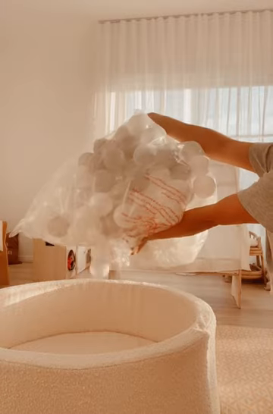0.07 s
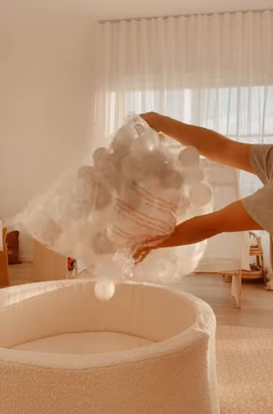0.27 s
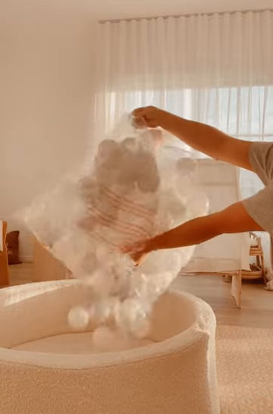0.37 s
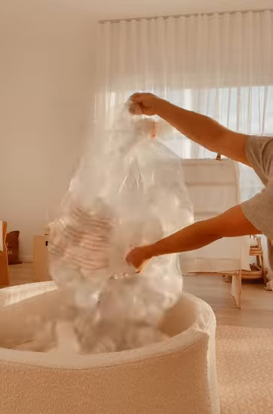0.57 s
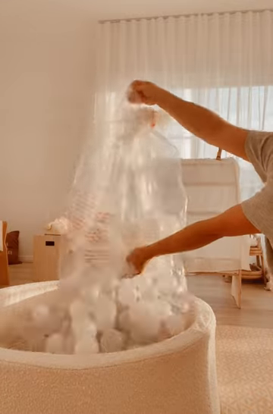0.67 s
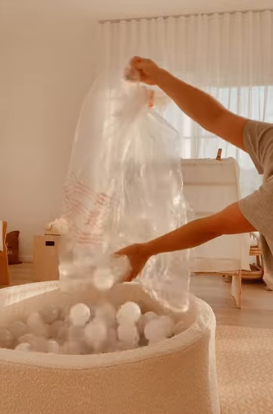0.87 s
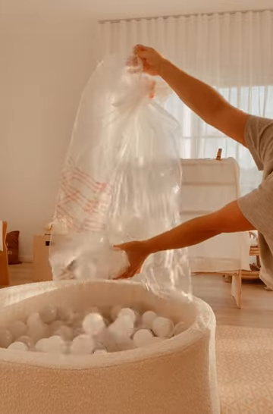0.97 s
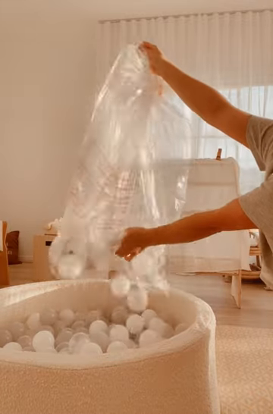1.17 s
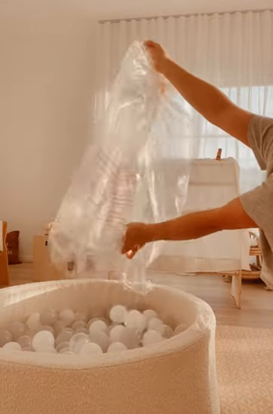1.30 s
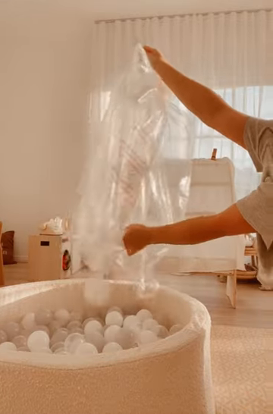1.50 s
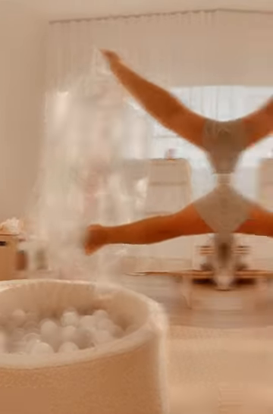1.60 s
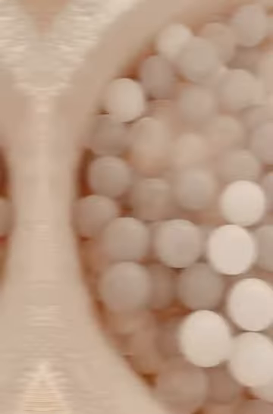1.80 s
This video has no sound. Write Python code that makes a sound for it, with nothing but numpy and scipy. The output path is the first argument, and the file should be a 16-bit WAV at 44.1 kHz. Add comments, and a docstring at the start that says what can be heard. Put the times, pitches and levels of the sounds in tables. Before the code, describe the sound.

Hollow plastic balls pour into a padded pit in a furnished room. One drops first, then the mass tumbles with clatter and soft thuds while a thin bag crinkles. A few stragglers land and the sound fades.

```python
"""Hollow plastic balls pour from a thin plastic bag into a padded ball pit in a furnished room.
One ball drops first, the mass follows, then a few stragglers. Each impact excites the shell's
resonances as a click and a hollow knock, while the yielding padding gives a low thud.
The balls clatter against each other and the bag crinkles; the sound fades out at the end."""
import sys
import numpy as np
from scipy import signal
from scipy.fft import rfft, irfft, next_fast_len
from scipy.io import wavfile

SR = 44100
rng = np.random.default_rng(int(sys.argv[2]) if len(sys.argv) > 2 else 0)


def inscribe(sig):
    """Save sig as 16-bit PCM at rate SR to the path in sys.argv[1].

    A 1-D sig is mono; a 2-D sig holds one channel per row.
    Samples are clipped to [-1, 1] before scaling.
    """
    pcm = np.round(np.clip(np.atleast_2d(sig).T, -1, 1) * 32767)
    wavfile.write(sys.argv[1], SR, pcm.astype(np.int16))


N = 81585

# Reverberation time of the room: frequency_hz, t60_s
ROOM_DECAY = [(100, 0.5), (500, 0.5), (4000, 0.57), (12000, 0.6)]
# Relative envelope of the crinkling bag: time_s, level_db
CRINKLE_LEVEL = [(0, -70), (.07, -65), (.19, -63.5), (.3, -58), (.39, -54), (.6, -53), (.75, -58),
                 (.87, -65), (.94, -60), (.98, -63), (1.06, -59.5), (1.17, -59.5), (1.32, -68), (1.36, -64),
                 (1.4, -70), (1.44, -66), (1.52, -69), (1.57, -82.5), (1.7, -89)]
# Sharp snaps of the bag film: start_s, level_db
FILM_SNAPS = [(.098, -61), (1.051, -55.5), (1.055, -59.5), (1.526, -71.5)]
# Spectrum of the thin film: frequency_hz, gain_db
FILM_SPECTRUM = [(100, -8.5), (500, 13), (1500, 8), (4000, 2), (6500, 2), (9500, -0.5), (12500, -8),
                 (15500, -15)]
# Envelope of the balls clattering together: time_s, level_db
CLATTER_LEVEL = [(0, -63), (.08, -59.5), (.2, -54), (.22, -50.5), (.33, -49), (.39, -40.5), (.57, -36.5),
                 (.74, -39), (.82, -43.5), (.97, -49), (1.045, -52.5), (1.08, -43.5), (1.14, -52),
                 (1.23, -52.5), (1.25, -49), (1.39, -61.5), (1.45, -59.5), (1.52, -62.5), (1.57, -69),
                 (1.7, -84.5)]
# Two shells clacking together: start_s, level_db
SHELL_CLACKS = [(1.048, -45), (1.054, -45.5), (1.527, -62), (1.581, -66.5)]
# Click spectrum of a thin plastic shell: frequency_hz, gain_db
SHELL_SPECTRUM = [(200, -45), (700, -11.5), (1000, 1.5), (1350, 3.5), (1800, -0.5), (2400, 0.5), (3200, -1),
                  (4100, 1), (4800, -6), (5600, -10), (6600, -20), (9000, -30), (15000, -45)]
# Spectrum of the padded floor: frequency_hz, gain_db
PADDING_SPECTRUM = [(25, -12), (55, -25), (75, -14.5), (89, -8.5), (104, -11.5), (127, 4), (157, 1.5),
                    (180, -10), (200, 3), (225, -11.5), (270, -4.5), (310, -4.5), (500, -34.5), (1500, -54)]
# Knock spectrum of a ball landing on the padding: frequency_hz, gain_db
FLOOR_KNOCK_SPECTRUM = [(100, -34.5), (220, 2.5), (300, -17), (355, 5.5), (450, -1.5), (570, -7.5),
                        (760, -2.5), (850, -11), (970, -20.5), (1500, -37.5), (4000, -54)]
# Knock spectrum of a ball landing on other balls: frequency_hz, gain_db
HEAP_KNOCK_SPECTRUM = [(100, -47), (220, 4.5), (300, -2), (380, -4), (480, 1), (570, -3), (670, -1.5),
                       (790, -0.5), (860, -9.5), (980, -19.5), (1500, -34), (4000, -54.5)]
# Single balls landing: start_s, thud_db, thud_pitch_hz, knock_db, click_db
BALL_LANDINGS = [(.207, -28, 190, -37.5, -49.5), (.331, -33.5, 210, -49, -52),
                 (0.368, -31, 210, -35.5, -51.5), (.513, -25, 202, -30, -61),
                 (0.573, -24, 177.6, -41, -51.5), (0.625, -21, 159, -32, -54), (.637, -25, 348, -33.5, -54),
                 (.667, -33, 214, -30.5, -51), (.717, -28.5, 143, -37, -53), (.745, -31, 142, -41.5, -54.5),
                 (0.988, -38, 228, -46.5, -50), (1.067, -35.5, 203, -42, -60),
                 (1.132, -41.5, 196, -43.5, -52.5), (1.239, -37.5, 213, -44, -49),
                 (1.277, -60, 195, -48, -65), (1.305, -41.5, 226, -46.5, -53),
                 (1.343, -44.5, 160, -53.5, -62), (1.407, -53, 210, -51.5, -67),
                 (1.432, -50, 184, -56.5, -66), (1.591, -40.5, 201, -57, -67)]
# Share of the pit floor covered by balls: time_s, covered_fraction
FLOOR_COVER = [(.45, 0.18), (1.05, 0.97)]
# Relative envelopes of the tumbling mass: time_s, knock_db, rumble_db
POUR_LEVELS = [(0, -67, -62), (.195, -58.5, -59), (.235, -41, -43), (.32, -52, -54), (.4, -35.5, -39.5),
               (.47, -29.5, -33), (.57, -30, -28), (.66, -27, -30), (.755, -33.5, -29.5),
               (.81, -32.5, -37.5), (.97, -41, -49), (1.04, -43, -44), (1.085, -37.5, -50.5),
               (1.14, -41, -46.5), (1.215, -55, -55), (1.3, -44, -45.5), (1.39, -59, -62.5),
               (1.5, -67, -65.5), (1.57, -67.5, -72.5), (1.7, -84.5, -91)]


def amp(db):
    """Amplitude grows tenfold for every 20 dB."""
    return 10 ** (np.asarray(db) / 20)


def unit(x):
    """Normalisation to an rms of 1."""
    return x / np.sqrt(np.mean(x ** 2) + 1e-20)


def along(points, hz):
    """Interpolation of (frequency_hz, value) points on a logarithmic axis."""
    f, v = np.transpose(points)
    return np.interp(np.log(hz + 1), np.log(f + 1), v)


def envelopes(rows):
    """Interpolation in decibels gives one amplitude envelope per level column."""
    time_s, *columns = np.transpose(rows)
    return [amp(np.interp(np.arange(N) / SR, time_s, db)) for db in columns]


def coloured(x, spectrum):
    """Minimum-phase filtering: folding the cepstrum makes the response causal."""
    m = 2 * next_fast_len(N)
    cepstrum = irfft(np.log(amp(along(spectrum, np.fft.rfftfreq(m, 1 / SR)))), m)
    cepstrum[1:m // 2] *= 2
    cepstrum[m // 2 + 1:] = 0
    return irfft(rfft(x, m) * np.exp(rfft(cepstrum)), m)[:len(x)]


def decay(t60_s):
    """Damped vibration decays exponentially, by 60 dB in t60_s."""
    t = np.arange(SR // 8) / SR
    return amp(-60 * t / t60_s)


def contacts(rate_hz, scatter_db, t60_s, spectrum):
    """Incoherent addition: irregular contacts sum in energy to a noise stream, scaled to rms 1."""
    chance = rng.random((N // 8, 2))[:int(rate_hz * N / SR)]
    onsets = ((np.arange(len(chance)) + 2 * chance[:, 0]) * SR / rate_hz).astype(int) % N
    strength = amp(scatter_db * np.minimum(-np.log(chance[:, 1]), np.pi))
    impulses = np.bincount(onsets, strength ** 2, N)
    energy = abs(signal.fftconvolve(impulses, decay(t60_s) ** 2)[:N])
    return unit(coloured(np.sqrt(energy) * rng.standard_normal(N), spectrum))


def strikes(starts_s, levels_db, t60_s, spectrum):
    """Impact excitation: noise bursts drive a resonant body; levels are the rms of the first 10 ms."""
    out = np.zeros(N + SR)
    body = coloured(signal.unit_impulse(SR // 20), spectrum)
    damping = decay(t60_s)
    for start_s, db in zip(starts_s, levels_db):
        ring = signal.fftconvolve(rng.standard_normal(len(damping)) * damping, body)
        out[int(start_s * SR):][:len(ring)] += amp(db) * ring / np.std(ring[:SR // 100])
    return out[:N]


def background():
    """A faint steady background noise carries a low rumble near 90 Hz, as of the bag being handled."""
    spectrum = [(30, -8.5), (90, 9), (1000, -25.5), (10000, -36.5)]  # frequency_hz, gain_db
    return amp(-79) * unit(coloured(rng.standard_normal(N), spectrum))


def reverberation(x, tail_count=8):
    """A diffuse room tail decays exponentially; crossfading random tails avoids ringing tones."""
    out = np.zeros(N)
    tail_index = np.linspace(0, tail_count - 1, N)
    for k in range(tail_count):
        hz, t, noise = signal.stft(rng.standard_normal(SR // 2), SR, nperseg=256)
        absorption = amp(-60 * t / along(ROOM_DECAY, hz)[:, None])
        tail = signal.istft(noise * absorption, SR, nperseg=256)[1]
        response = np.pad(tail / np.linalg.norm(tail), (SR // 200, 0))  # 5 ms late
        crossfade = np.sqrt(np.clip(1 - abs(tail_index - k), 0, 1))
        out += signal.fftconvolve(x * crossfade, response)[:N]
    return amp(-10.5) * out


def wall_reflection(x, delay_s=0.02):
    """Early reflection: the nearest wall returns a delayed, weaker and duller copy."""
    delayed = np.pad(x, (int(delay_s * SR), 0))[:N]
    return amp(-13) * coloured(delayed, [(300, 1.5), (900, -18)])


def bag():
    """Buckling: thin film crinkles in tiny creases and now and then snaps taut."""
    level, = envelopes(CRINKLE_LEVEL)
    crinkle = level * contacts(rate_hz=1600, scatter_db=1.0, t60_s=0.0023, spectrum=FILM_SPECTRUM)
    return amp(3) * crinkle + strikes(*np.transpose(FILM_SNAPS), t60_s=0.018, spectrum=FILM_SPECTRUM)


def clatter():
    """Brief, hard contacts between shells excite their high modes; a few clacks stand out."""
    level, = envelopes(CLATTER_LEVEL)
    clicks = level * contacts(rate_hz=600, scatter_db=1.5, t60_s=0.06, spectrum=SHELL_SPECTRUM)
    return clicks + strikes(*np.transpose(SHELL_CLACKS), t60_s=0.032, spectrum=SHELL_SPECTRUM)


def thuds(sink_s=0.00915, half_width_cycles=0.94):
    """Compliant padding spreads each impact into a low pulse that peaks sink_s after the first touch."""
    start_s, thud_db, pitch_hz = np.transpose(BALL_LANDINGS)[:3]
    cycles = (np.arange(N) / SR - start_s[:, None] - sink_s) * pitch_hz[:, None]
    envelope = amp(thud_db)[:, None] * np.exp(-(cycles / half_width_cycles) ** 2)
    return -(envelope * np.cos(2 * np.pi * cycles)).sum(0)


def landings():
    """Free vibration: the first touch sets a ball ringing with a hollow knock and a shorter click."""
    start_s, _, _, knock_db, click_db = np.transpose(BALL_LANDINGS)
    knocks = strikes(start_s, knock_db, t60_s=0.12, spectrum=FLOOR_KNOCK_SPECTRUM)
    return knocks + strikes(start_s, click_db, t60_s=0.035, spectrum=SHELL_SPECTRUM)


def pour():
    """Dense impacts merge into drumming; as the pit fills, their energy shifts from floor to heap."""
    knock_level, rumble_level = envelopes(POUR_LEVELS)
    covered = np.interp(np.arange(N) / SR, *np.transpose(FLOOR_COVER))
    on_floor = contacts(rate_hz=280, scatter_db=-1.3, t60_s=0.022, spectrum=FLOOR_KNOCK_SPECTRUM)
    on_heap = contacts(rate_hz=260, scatter_db=-0.5, t60_s=0.055, spectrum=HEAP_KNOCK_SPECTRUM)
    rumble = contacts(rate_hz=180, scatter_db=1.15, t60_s=0.019, spectrum=PADDING_SPECTRUM)
    knocks = np.sqrt(1 - covered) * on_floor + np.sqrt(covered) * on_heap
    return amp(-2.5) * (knock_level * knocks + rumble_level * rumble)


def scene():
    """Superposition of direct sound, wall reflection, reverberation and background."""
    plastic = bag() + clatter() + pour() + landings()
    padding = thuds()
    direct = plastic + padding
    ambient = background()
    diffuse = reverberation(plastic + amp(-10.5) * padding)  # the pit's soft sides hold the thuds in
    return (direct + wall_reflection(direct) + diffuse + ambient)[None]


def record(dry, low_cut_hz=54, top_hz=15700, fade_s=(1.68, 1.735)):
    """Band limiting trims the thuds' deepest bass and the top treble; a quick fade ends the sound."""
    high_passed = signal.sosfilt(signal.butter(2, low_cut_hz, "high", fs=SR, output="sos"), dry)
    faded = high_passed * np.interp(np.arange(N) / SR, fade_s, [1, 0])
    m = 2 * next_fast_len(N)
    passband = np.fft.rfftfreq(m, 1 / SR) < top_hz
    return irfft(rfft(faded, m) * passband, m)[:, :N]


dry = scene()
out = record(dry)
inscribe(out)
```